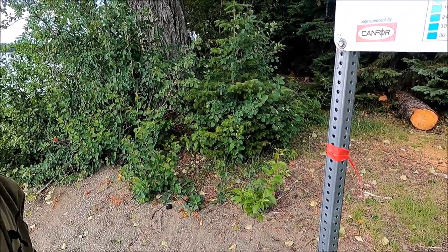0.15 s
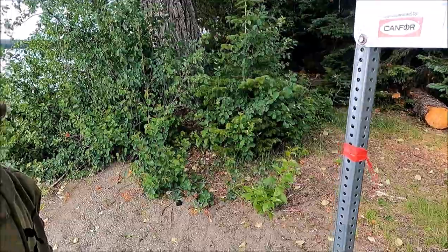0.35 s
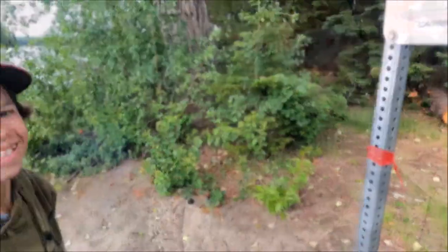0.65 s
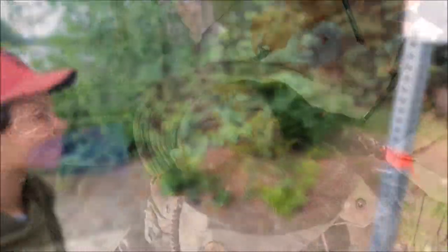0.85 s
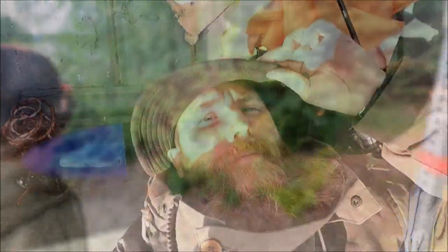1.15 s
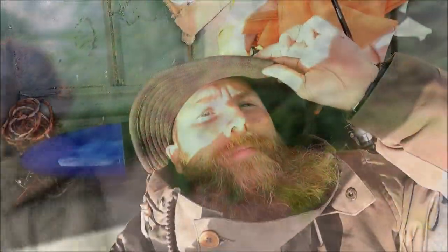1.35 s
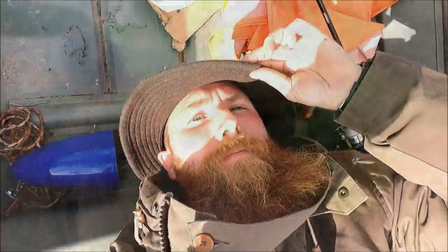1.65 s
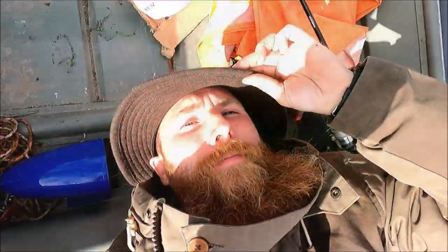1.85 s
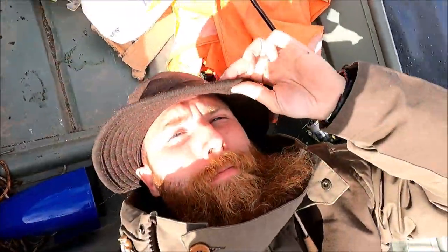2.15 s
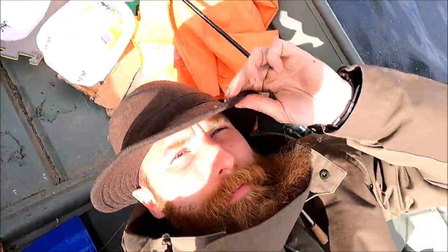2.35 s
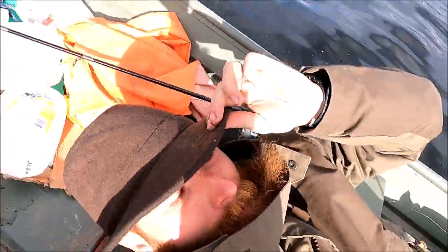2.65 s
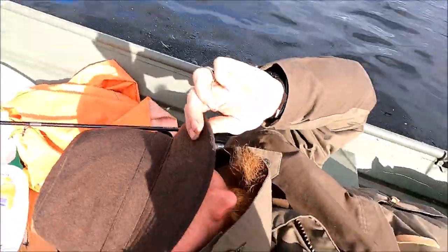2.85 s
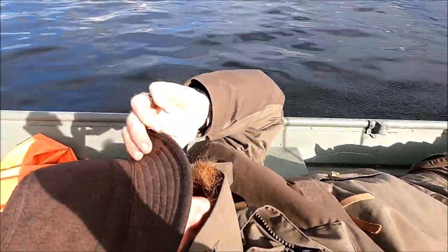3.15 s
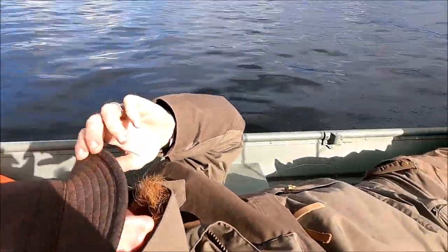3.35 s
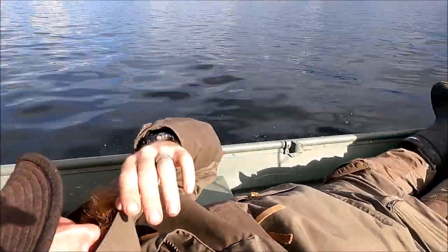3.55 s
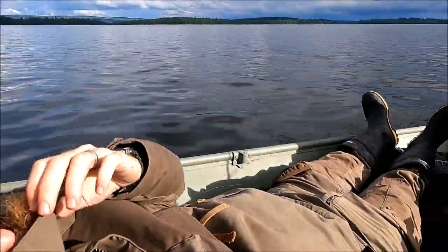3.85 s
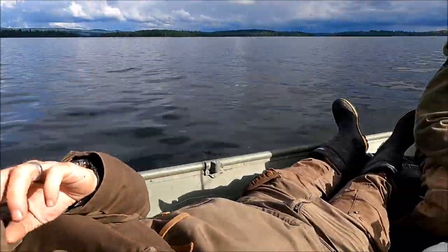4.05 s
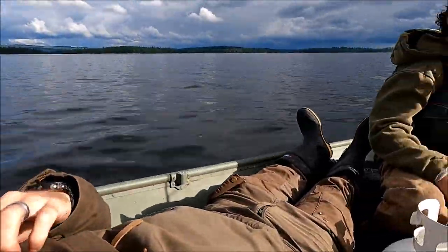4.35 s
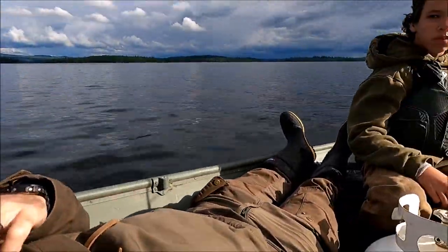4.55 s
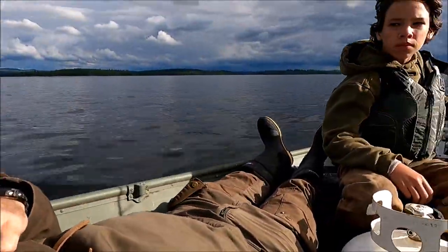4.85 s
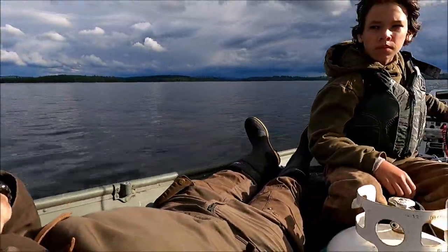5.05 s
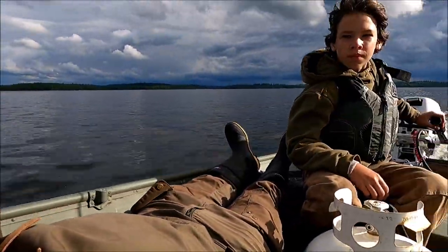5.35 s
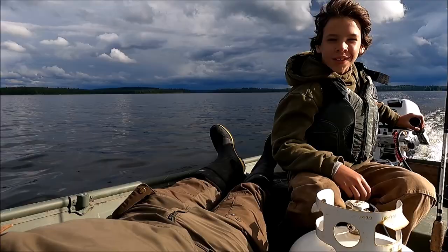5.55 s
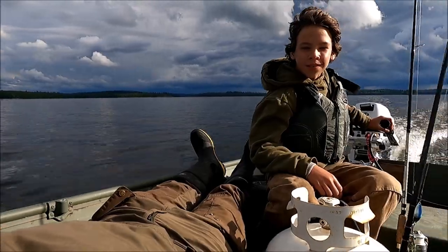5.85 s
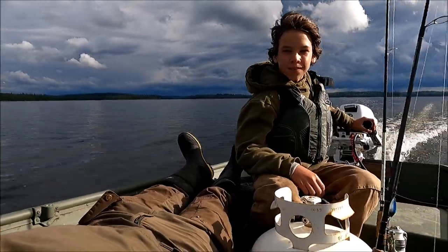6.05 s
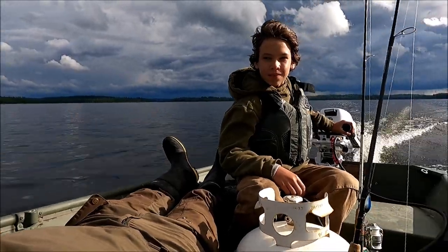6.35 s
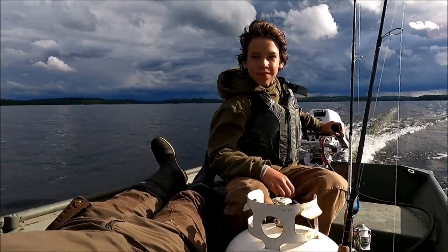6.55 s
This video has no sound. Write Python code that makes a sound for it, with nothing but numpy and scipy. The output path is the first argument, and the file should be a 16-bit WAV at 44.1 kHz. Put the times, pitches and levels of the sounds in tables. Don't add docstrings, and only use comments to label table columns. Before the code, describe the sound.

From 0 to about 0.7 seconds, a hushed lakeshore: faint leaf rustle and far water, with small footstep ticks, a drier snap near 0.35 and a short gritty scuff at 0.5. Around 0.8 the shore fades under a small open boat at speed, quiet at first. A two-cylinder outboard holds one steady rate, a low buzzing drone near 84 hertz with rough harmonics and faint valve and gear clatter. Until about 2.5 seconds the microphone faces the bow, so hull roar and irregular sheets of spray stand out; tiny bright ticks accompany the rising level. From 2.5 to 5 it turns toward the motor: tones shift and waver, spray recedes, and intake hiss opens brighter near 4.6. Wind bumps low and soft throughout, notably around 4.0 and 4.3. From 5.5 the loud, full drone stays nearly level, cutting off at 6.7.

```python
import sys
import numpy as np
from scipy import signal
from scipy.fft import rfft, irfft
from scipy.io import wavfile
from scipy.ndimage import uniform_filter1d

SR = 44100
rng = np.random.default_rng(int(sys.argv[2]) if len(sys.argv) > 2 else 0)


def volts_from_decibels(level):
    exponent = np.asarray(level, float) / 20
    return 10 ** exponent


def to_wav(s):
    ch = np.atleast_2d(s).T
    pcm = np.round(np.clip(ch, -1, 1) * 32767)
    wavfile.write(sys.argv[1], SR, pcm.astype(np.int16))


N = 295818
CYCLE_HZ = 41.9


def evened(x):
    return x / np.sqrt(np.mean(x ** 2) + 1e-20)


def seconds():
    return np.arange(N) / SR


def curve(rows, column=1):
    table = np.array(rows)
    return np.interp(seconds(), table[:, 0], table[:, column])


def drift(hz, count=1, size=1):
    length = N // 64 + 2
    rate_hz = np.fft.rfftfreq(length, 64 / SR)
    slow = irfft(rfft(rng.standard_normal((count, length))) / (1 + (rate_hz / hz) ** 2))
    at = np.arange(0, N, size) / 64
    return np.array([np.interp(at, np.arange(len(s)), evened(s)) for s in slow])


def noise(points, band_hz, patchy_db, size=512):
    speck_db, speck_from_hz = 1.8, 800
    frames, hz = 4 * N // size + 5, np.fft.rfftfreq(size, 1 / SR)
    a, b, grain = rng.standard_normal((frames, len(hz), 3)).T
    specks = evened(uniform_filter1d(uniform_filter1d(grain, size=2, axis=0), size=5, axis=1))
    patches = evened(uniform_filter1d(uniform_filter1d(grain, size=9, axis=0), size=10, axis=1))
    f, level_db = np.transpose(points)
    colour = volts_from_decibels(np.interp(np.log(hz + 1), np.log(f + 1), level_db, left=-90, right=-90))
    lift_db = patchy_db * patches + speck_db * specks * (hz > speck_from_hz)[:, None]
    z = (a + 1j * b) * colour[:, None] * volts_from_decibels(lift_db)
    inside = (hz > band_hz[0]) & (hz < band_hz[1])
    share = np.sum(colour[inside] ** 2) / np.sum(colour ** 2)
    sound = signal.istft(z, nperseg=size, noverlap=3 * size // 4)[1][:N]
    return evened(sound) / np.sqrt(share)


# time in seconds, cycle rate in Hz.
SPEED = [(.7, 41.92), (2, 41.93), (3.2, 41.98), (4.2, 41.93), (5.8, 41.9), (6.15, 41.83), (6.45, 41.9),
         (6.71, 41.9)]


def crank_turns():
    return np.cumsum(curve(SPEED) + .02 * drift(2.5)[0]) / SR


# time in seconds, facing the motor 0-1.
TURN = [
    (.7, 0.02),
    (1.7, 0),
    (2.7, 0.35),
    (3.6, 0.52),
    (4.4, 0.89),
    (5.1, 1),
    (6.71, 0.92),
]


def facing_motor():
    return np.clip(curve(TURN), 0, 1)


# order of the cycle rate, level in dB.
AWAY = [(1, -29.0), (2, -3.0), (3, -15.0), (4, -20.0), (5, -6.0), (6, -11.0), (7, -17.0), (8, -12.0),
        (9, -14.0), (10, -18.0), (11, -22.0), (12, -32.0), (13, -22.0), (14, -17.0), (15, -42.0),
        (16, -23.0), (17, -43.0), (18, -38.0), (19, -24.0), (20, -25.0), (21, -35.0), (22, -44.0),
        (23, -43.0), (24, -46.0), (25, -45.0), (26, -40.0), (27, -34.0), (28, -33.0), (29, -32.0),
        (30, -31.0), (31, -33.0), (32, -32.0)]
SIDE_ON = [(1, -27.0), (2, -3.0), (3, -6.0), (4, -16.0), (5, -10.0), (6, -8.0), (7, -14.0), (8, -14.0),
           (9, -19.0), (10, -12.0), (11, -16.0), (12, -28.0), (13, -21.0), (14, -22.0), (15, -40.0),
           (16, -31.0), (17, -34.0), (18, -30.0), (19, -29.0), (20, -36.0), (21, -33.0), (22, -40.0),
           (23, -31.0), (24, -39.0), (25, -38.0), (26, -29.0), (27, -36.0), (28, -34.0), (29, -36.0),
           (30, -33.0), (31, -36.0), (32, -35.0)]
FACING = [(1, -28.0), (2, -3.0), (3, -5.0), (4, -10.0), (5, -10.0), (6, -13.0), (7, -8.0), (8, -7.0),
          (9, -13.0), (10, -18.0), (11, -26.0), (12, -41.0), (13, -17.0), (14, -17.0), (15, -32.0),
          (16, -36.0), (17, -30.0), (18, -28.0), (19, -33.0), (20, -35.0), (21, -47.0), (22, -51.0),
          (23, -45.0), (24, -51.0), (25, -48.0), (26, -23.0), (27, -30.0), (28, -37.0), (29, -52.0),
          (30, -32.0), (31, -36.0), (32, -40.0)]
# ring in Hz, phase turn in rad.
PANELS = [(190, 1.8), (315, 2.3), (398, 2.9), (480, 2.6), (566, .8)]


def firing(turns, facing):
    panel_width_hz, lead_rad, delay_rad, wander_rad = 5, .6, .05, .04
    bench_hz, bench_width_hz, bench_turn_rad = 210, 75, 2.1
    order = np.transpose(FACING)[0]
    at, hz = np.arange(0, N, 256), order * CYCLE_HZ
    held = sum(turn * (.5 + np.arctan((hz - f) / panel_width_hz) / np.pi) for f, turn in PANELS)
    lag = lead_rad - delay_rad * order - held
    bench = bench_turn_rad * np.exp(-((hz - bench_hz) / bench_width_hz) ** 2)[:, None]
    bench = bench * np.clip(1.9 - 2.4 * facing[at], 0, 1)
    wander = wander_rad * np.minimum(order, 16)[:, None] * drift(2.5, count=len(order), size=256)
    lag = lag[:, None] + bench + wander
    waver_db = 1.3 * drift(3.0, count=len(order), size=256) + spots_db(order, at / SR)
    heard_db = np.array([AWAY, SIDE_ON, FACING])[:, :, 1].T
    low = np.arange(0, N, 8)
    cycle, tone, out = np.exp(2j * np.pi * turns[::8]), 1, 0
    for db, p, w in zip(heard_db, lag, waver_db):
        tone = tone * cycle
        level = volts_from_decibels(np.interp(facing[at], (0, .5, 1), db) + w)
        out = out + (tone * np.interp(low, at, level * np.exp(1j * p))).real
    return signal.resample_poly(out, 8, 1, window=("kaiser", 10))[:N]


# time in seconds, tone in Hz, lift in dB, length in seconds.
SPOTS = [(1.7, 84, -1.5, 0.13), (6.35, 84, -2, .3), (2.5, 126, -6, 0.1), (4.9, 126, -2.5, 0.26),
         (6.5, 126, -0.5, 0.18), (2.65, 168, 13.5, 0.16), (5.6, 168, 4.5, 0.21), (2.3, 252, 1.5, 0.51),
         (2.55, 252, -12, 0.094), (3.48, 252, -3.5, 0.09), (6.4, 252, -5, 0.17), (6.55, 252, 11, 0.12),
         (2.6, 293, -8, 0.18), (6, 293, 0.5, 0.2), (4.4, 335, -1, 0.34), (4.74, 335, 1, 0.21),
         (4.4, 335, -12, 0.076), (6.4, 335, -2.5, 0.25), (2.4, 377, 1.5, .35), (4.9, 377, 2.5, 0.32),
         (2.8, 419, 1.5, .3), (4.1, 419, -3, .3), (5.1, 419, -8, 0.31), (2.9, 461, 4, .3),
         (4.9, 461, -9.5, 0.55), (2.5, 545, 5.5, .3), (3.2, 545, -6, 0.17), (2.54, 587, 4, 0.46),
         (3.1, 587, -11, 0.15), (4.12, 587, 3, 0.24), (5.2, 587, -3.5, 0.36), (4.15, 168, -5, 0.15),
         (4.84, 210, -1, .2), (4, 84, 2, 0.31), (6.5, 335, 1.5, .2), (4.2, 1090, -3.5, .4),
         (3.0, 629, -8, .3), (5.2, 545, -2, .3), (4.1, 587, 2, .3), (5.6, 293, 4, 0.083),
         (6.1, 126, 0.5, 0.12), (4.63, 210, 1, 0.091), (2.5, 210, -1.5, .15), (4.35, 335, -3, 0.21),
         (1.0, 210, 3.5, .35), (5.7, 252, -4, 0.24), (6.4, 461, 6, .2), (4.7, 503, 5, 0.34),
         (6.3, 629, 2, .4)]


def spots_db(order, t):
    return sum(db * np.exp(-((t - s) / length) ** 2) * (order == round(hz / CYCLE_HZ))[:, None]
               for s, hz, db, length in SPOTS)


# frequency in Hz, level in dB.
GEAR = [(1593, -64), (2304, -65), (2681, -73), (2891, -72), (3898, -72), (4064, -72), (5530, -75),
        (5696, -73), (6288, -75), (6498, -76)]


def clatter(turns):
    order = np.arange(33, 170)
    height, phase = rng.random((2, len(order)))
    height = volts_from_decibels(-65.5) * (0.48 + height) * (order / 40) ** -1.1
    for hz, db in GEAR:
        height[round(hz / CYCLE_HZ) - order[0]] = volts_from_decibels(db + 6.5)
    step = np.arange(4096) / 4096
    cycle = height @ np.cos(2 * np.pi * (order[:, None] * step + phase[:, None]))
    return np.interp(turns % 1, step, cycle, period=1)


# frequency in Hz, density in dB per Hz.
HISS = [(880, -28), (1500, -1), (2030, 3), (2220, -1), (2570, -10.5), (2920, -11.5), (3160, -34),
        (4180, -5), (5030, -8), (5540, -7.5), (6000, -11), (6550, -10.5), (8470, -20.5), (10200, -32),
        (13200, -59.5), (22000, -120)]
SHADED = [(880, -27), (2030, 1.5), (2570, -9.5), (3000, 1), (3600, -13.5), (4400, -13), (5800, -16),
          (6700, -15.5), (8470, -18), (10200, -34), (13200, -57.5), (22000, -120)]


def cowl():
    clear_s, clearing_s, shaded_db = 4.59, 0.45, -2
    clear = np.pi / 2 * np.clip(.5 + (seconds() - clear_s) / clearing_s, 0, 1)
    unshaded = np.sin(clear) * noise(HISS, (5500, 10000), 0.72)
    return unshaded + np.cos(clear) * volts_from_decibels(shaded_db) * noise(SHADED, (5500, 10000), 0.7)


def cowl_hiss(turns, facing, crest_db, slaps, puffs):
    throb = 1 + 0.18 * facing * np.cos(2 * np.pi * turns) + 0.09 * np.cos(4 * np.pi * turns)
    level = volts_from_decibels(-39 + 0.97 * crest_db + 0.58 * slaps + 0.41 * puffs)
    return level * np.minimum(facing / 0.65, 1) ** 3.4 * throb * cowl()


# frequency in Hz, density in dB per Hz.
ROAR = [(29, -28), (50, -2.5), (91, -6.5), (249, -10), (321, -10.5), (481, -16), (576, -17.5), (649, -18.5),
        (917, -26), (1100, -25.5), (1800, -47.5), (2340, -58.5), (3960, -120)]


def hull_roar(turns, facing):
    shake = 1 - .25 * np.cos(2 * np.pi * (turns - .2))
    return volts_from_decibels(-5.0 - 3.8 * facing) * shake * noise(ROAR, (70, 700), 1.1, size=2048)


# frequency in Hz, density in dB per Hz.
SPRAY = [(410, -24.5), (700, -9), (813, 1), (914, -5.5), (1120, -4), (1190, -3.5), (1340, -4.5),
         (2690, -13.5), (2960, -13), (3830, -15), (5870, -27), (9000, -43), (11700, -70), (19800, -120)]


def bow_spray(facing, crest_db, slaps):
    shade_db = -12.5 * facing ** 2.9
    return volts_from_decibels(-19 + crest_db + shade_db + 1.0 * slaps) * noise(SPRAY, (1400, 4500), 0.8)


# crest in seconds, lift in dB, build-up in seconds.
WAVES = [(1.14, 3, 0.072), (1.33, 2.5, 0.52), (1.67, 2.5, 0.022), (1.77, 3, 0.025), (1.95, 3, 0.082),
         (2.53, 3.5, 0.092), (2.36, 2, 0.055), (2.6, 0, 0.018), (3.0, 4, 0.041), (3.06, 6, 0.04),
         (3.45, 4, 0.075), (3.95, 1.5, 0.6), (4.37, 3, 0.031), (4.6, 1.5, 0.11), (5.08, 4, .05),
         (5.36, -3, .004), (5.4, 3.5, 0.3), (5.5, 2, .06), (5.61, 2.5, .06), (5.85, 5.5, 0.022),
         (5.92, 6, 0.1), (6.24, 1.5, 0.06), (6.45, 0, .08), (6.7, -5, 0.093)]


def waves_db():
    drop_s, trough_share, trough_s = 0.033, 0.12, 0.098
    t = np.arange(0, N + 64, 64) / SR
    lift_db = np.max([db * np.exp(-abs(t - s) / np.where(t < s, build, drop_s)) for s, db, build in WAVES], axis=0)
    trough_db = sum(trough_share * db * np.sin(np.pi * np.clip((t - s) / trough_s, 0, 1)) ** 2
                    for s, db, build in WAVES)
    return np.interp(seconds(), t, lift_db - trough_db)


# frequency in Hz, density in dB per Hz.
WIND = [(8, -28.5), (14, 2), (30, -5.5), (48, -6.5), (62, -7.5), (80, -16), (120, -65)]


def wind_rumble():
    return volts_from_decibels(-22.5 + gusts_db() + 0.9 * drift(4.0)[0]) * noise(WIND, (20, 62), 0.99, size=8192)


# time in seconds, lift in dB, length in seconds.
GUSTS = [(1.0, 11, .05), (1.14, 8, .04), (1.3, 13, .05), (1.813, 19, .06), (2.06, 14, 0.046),
         (2.24, 14, 0.067), (2.505, -2, .06), (2.95, 5, .05), (3.27, 2, .06), (3.46, 7, .05),
         (3.82, 5, 0.074), (4.045, 22, 0.055), (4.253, 20.5, 0.04), (4.8, 9, .06), (4.963, 15.5, 0.05),
         (5.27, 16.5, 0.047), (5.466, 17.5, 0.07), (5.576, 16, 0.074), (5.844, 15, 0.08),
         (6.057, 15, 0.049), (6.313, 6, .05), (6.55, 16, 0.054), (6.68, 15.5, 0.063)]


def gusts_db():
    t = np.arange(0, N + 64, 64) / SR
    lift_db = np.max([db * np.exp(-((t - s) / length) ** 2) for s, db, length in GUSTS], axis=0)
    return np.interp(seconds(), t, lift_db)


# frequency in Hz, density in dB per Hz.
AIR = [(7000, -23), (10500, 5.5), (12500, -3.5), (15000, -5.5), (16500, -37.5)]


def open_air(patchy_db):
    return noise(AIR, (10500, 15000), patchy_db)


# time in seconds, motor and hull level in dB.
BOAT = [(.72, -25), (.9, -40.5), (1.55, -31.5), (2.15, -29), (2.7, -28), (3.3, -26), (4.0, -24.5),
        (4.9, -22.5), (5.55, -21), (5.9, -21.5), (6.1, -20.5), (6.71, -20.5)]


def boat():
    turns, facing = crank_turns(), facing_motor()
    level_db, crest_db = curve(BOAT), waves_db()
    slaps, puffs = drift(30.0, count=2)
    motor = firing(turns, facing) + volts_from_decibels(13.5 + 4.3 * facing) * clatter(turns)
    hull = hull_roar(turns, facing)
    wind = wind_rumble()
    water = bow_spray(facing, crest_db, slaps) + cowl_hiss(turns, facing, crest_db, slaps, puffs)
    air = volts_from_decibels(.5 * level_db - 81.5 + 2.5 * slaps) * open_air(3.0)
    fade = np.clip((seconds() - .76) / .125, 0, 1) ** 1.5
    late = np.clip((seconds() - .7) / .22, 0, 1)
    return fade * (volts_from_decibels(level_db) * (motor + hull + wind + late * water) + air)


# time in seconds, peak in dB.
STEPS = [(0.9448, -72), (1.0779, -77), (1.2116, -84), (1.3114, -83), (1.3783, -77), (1.4451, -81),
         (1.512, -70), (1.5788, -79), (1.712, -78), (1.8123, -76), (1.8457, -77), (1.9295, -83),
         (2.0123, -85)]


def fader_steps():
    hz, t60_s, lift_db = 13500, .001, 14
    t, out = np.arange(200) / SR, np.zeros(N)
    tick = volts_from_decibels(-60 * t / t60_s) * (1 - np.exp(-t / (.15 * t60_s))) * np.sin(2 * np.pi * hz * t)
    for s, db in STEPS:
        out[round(s * SR):][:len(t)] += volts_from_decibels(db + lift_db) * tick
    return out


# time in seconds, peak in dB, ring in Hz, t60 in seconds.
TICKS = [(.022, -39, 60, .035), (.002, -66, 12000, .001), (.176, -60, 13500, .0012), (.218, -42, 150, .014),
         (.3548, -39, 1700, .009), (.358, -47, 1350, .012), (.506, -46, 1200, .012), (.52, -51, 1450, .012),
         (.402, -72, 11000, .001), (.437, -54, 1300, .025), (.478, -49, 1100, .012), (.505, -44, 150, .035),
         (.535, -47, 170, .035), (.585, -50, 90, .05), (.618, -50, 110, .04)]


def footstep_ticks():
    t, out = np.arange(4000) / SR, np.zeros(N)
    for s, db, hz, t60 in TICKS:
        rise = 1 - np.exp(-t / (.15 * t60))
        out[round(s * SR):][:len(t)] -= volts_from_decibels(db + 8 - 60 * t / t60) * rise * np.sin(2 * np.pi * hz * t)
    return out


# start in seconds, peak in dB, attack in seconds, fading in dB per second, length in seconds.
SCUFF = (.504, -60, .005, 60, .14)
# frequency in Hz, density in dB per Hz.
GRIT = [(59, -39), (100, -16.5), (420, -16), (600, -12), (937, -4), (1450, -7), (1800, -22), (2860, -45)]


def scuff():
    start, db, attack, fading_db, length = SCUFF
    t = seconds() - start
    rise = np.clip(t / attack, 0, 1)
    lift_off = np.clip((length - t) / (8 * attack), 0, 1)
    stroke = rise * lift_off * volts_from_decibels(db - fading_db * np.clip(t, 0, 1))
    return stroke * noise(GRIT, (100, 2200), 2.5, size=256)


# frequency in Hz, density in dB per Hz.
SHORE = [(12, -28), (20, 2), (70, -7), (286, -6), (549, -12), (731, -11.5), (1000, -15), (1110, -13),
         (1970, -23), (3490, -24), (5300, -29), (10200, -49), (13200, -79), (22000, -120)]
# time in seconds, level in dB.
SHORE_DB = [(0, -64), (.11, -63), (.22, -68), (.45, -67), (.62, -64), (.8, -65)]


def shore():
    fade = np.clip((1.6 - seconds()) / .8, 0, 1)
    leaves = volts_from_decibels(curve(SHORE_DB) + 4) * noise(SHORE, (100, 1300), 2, size=1024)
    air = volts_from_decibels(-101) * open_air(1)
    return fade * (leaves + air) + scuff() + footstep_ticks()


def scene():
    return (shore() + boat() + fader_steps())[None]


# time in seconds, edge in Hz, share left above it 0-1.
EDGE = [(0, 16000, 0), (1.9, 16000, .6), (2.05, 12500, .45), (3.25, 12900, .35), (3.35, 14300, 0),
        (5.5, 14300, 0), (5.78, 13000, 0), (5.82, 14400, 0), (6.05, 13200, 0), (6.15, 14300, 0),
        (6.55, 13100, 0), (6.71, 14200, 0)]
# time in seconds, length in seconds.
OPEN = [(2.7, .025), (2.8, .03), (2.97, .02), (3.15, .04), (3.68, .015), (3.8, .02), (4.02, .05),
        (4.23, .025), (4.44, .015), (4.73, .025), (5.04, .02), (5.26, .015), (6.08, .015), (6.3, .015)]


def narrowed(x):
    hz, t, z = signal.stft(x, SR, nperseg=1024, noverlap=768)
    wide = sum(np.exp(-((t - s) / length) ** 2) for s, length in OPEN)
    at = np.minimum((t * SR).astype(int), N - 1)
    edge_hz = (curve(EDGE) + 350 * drift(12)[0])[at] + 2500 * wide
    gain = np.clip((edge_hz - hz[:, None]) / 150, curve(EDGE, column=2)[at], 1)
    return signal.istft(z * gain, SR, nperseg=1024, noverlap=768)[1][:, :N]


def band_limit(x):
    return signal.sosfilt(signal.butter(12, 15550, fs=SR, output="sos"), x)


def record(dry):
    ceiling, offset = .5, .0005
    fade = np.clip((N - np.arange(N)) / 150, 0, 1)
    limited = ceiling * np.tanh(dry / ceiling)
    hiss = volts_from_decibels(-104) * rng.standard_normal(dry.shape)
    return band_limit(narrowed(fade * (limited - offset) + hiss))


dry = scene()
out = record(dry)
to_wav(out)
```